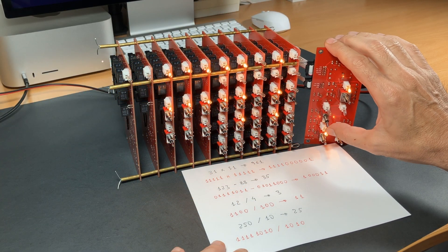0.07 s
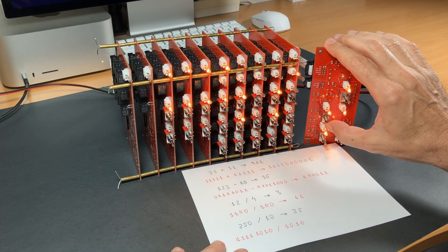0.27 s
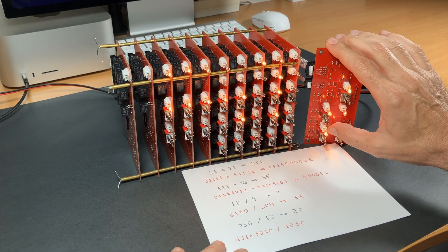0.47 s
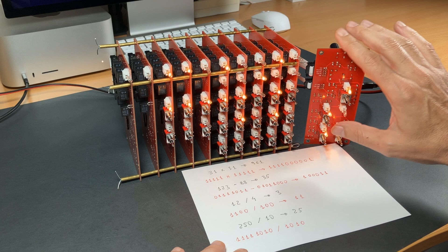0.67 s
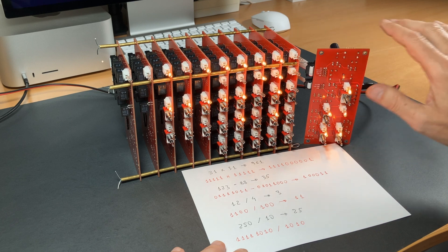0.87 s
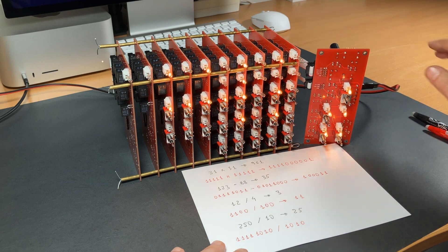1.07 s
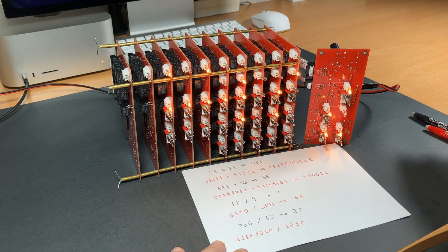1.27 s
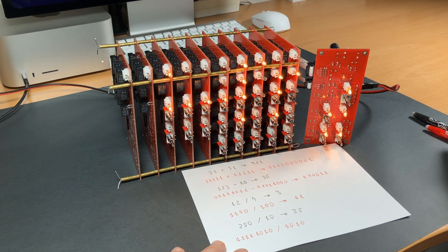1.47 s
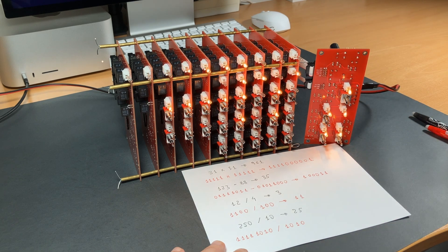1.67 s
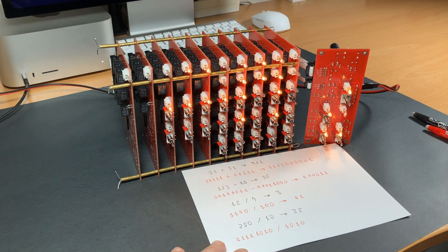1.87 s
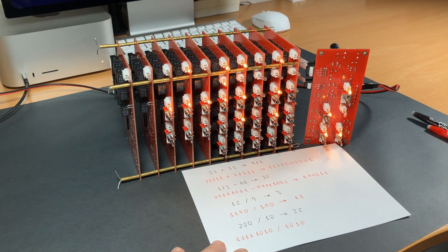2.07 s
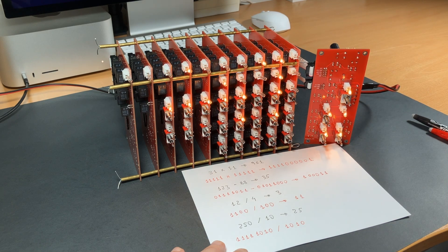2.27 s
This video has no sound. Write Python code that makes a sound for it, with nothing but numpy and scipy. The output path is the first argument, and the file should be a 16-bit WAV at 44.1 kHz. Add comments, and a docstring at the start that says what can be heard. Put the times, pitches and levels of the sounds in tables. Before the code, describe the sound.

Relays in a home-built calculator clatter in a fast, even rhythm, set off by one snap of a push button. The sharp metallic clicks ring slightly, heard close by in a small, quiet room.

```python
"""A relay calculator dividing

A push button starts a home-built calculator on a desk. Its clock pulls in a bank of relays (switches
worked by magnets) and lets them drop again, nearly nine times a second. Each stroke is a quick volley:
contacts snap, metal frames clink and the moving arms knock on the circuit boards.
The springs are left ringing in a small, quiet room."""
import sys
import numpy as np
from scipy import signal
from scipy.fft import rfft, irfft
from scipy.io import wavfile

SR = 44100
rng = np.random.default_rng(int(sys.argv[2]) if len(sys.argv) > 2 else 0)


def unload_wav(signal):
    """Save mono or channel-first audio to the path in sys.argv[1] as 16-bit WAV at rate SR, clipped to [-1, 1]."""
    wavfile.write(
        sys.argv[1],
        SR,
        np.round(np.clip(np.atleast_2d(signal).T, -1, 1) * 32767).astype(np.int16),
    )


N = 102797

# the clock's beats: (time [s], early snaps and clinks [dB], late ones [dB], board knocks [dB])
BEATS = [(0.2612, 0, 2.5, -1), (0.3779, 1.4, 0.5, 0), (0.4918, -0.7, 5.3, -3), (0.6088, -1, 1, 1.3),
         (0.7247, -0.3, 2.7, -0.8), (0.84, 2, 0, -0.5), (0.9558, 0.5, 3, -2.2), (1.071, 1.3, 1.5, -0.8),
         (1.1864, -1.0, 3, -2.5), (1.3018, 1.5, 2.5, 0), (1.4177, 1.6, 2.5, -2.5), (1.5331, -0.5, 2, 0.9),
         (1.6493, 1, 2, -1), (1.7637, 1.5, 0.5, -1), (1.8793, 1, 5, -2.7), (1.995, 3.7, 2, 1.5),
         (2.1105, 0.1, 0.5, -3.5), (2.227, 0.1, -1.1, 0)]


def amp(db):
    """Turns decibels into a gain."""
    return 10 ** (np.asarray(db) / 20)


def unit(x):
    """Scales a sound to an energy of one."""
    return x / np.sqrt(np.sum(x ** 2) + 1e-20)


def read(points, hz):
    """Reads between a table's rows on a logarithmic frequency scale."""
    freqs, values = np.transpose(points)
    return np.interp(np.log(hz + 1), np.log(freqs + 1), values)


def add(mix, start_s, sound):
    """Adds a sound to the mix at a given time."""
    part = mix[max(round(start_s * SR), 0):][:len(sound)]
    part += sound[:len(part)]


def fade(t, fade_s):
    """Dies away by 60 dB in the fade time."""
    return np.exp(-np.log(1000) * t / fade_s)


def colour(x, tone, size=4096):
    """Gives a sound a tone colour, using a filter that rings only after each hit."""
    log_gain = np.log(amp(read(tone, abs(np.fft.fftfreq(size, 1 / SR)))))
    taps = np.fft.ifft(np.exp(signal.hilbert(log_gain).conj())).real
    return signal.fftconvolve(x, unit(taps[:size // 2]))[:N]


def burst(fade_s, size=2048):
    """A small struck part rings at so many pitches that it sounds like a puff of noise."""
    envelope = fade(np.arange(size) / SR, fade_s)
    noise = rng.standard_normal(size) * envelope
    for _ in range(2):  # even out the frequencies
        spectrum = rfft(noise)
        noise = irfft(spectrum / (abs(spectrum) + 1e-12), size) * envelope ** (1 / 4)
    return unit(noise)


def ring(notes, detune=0.0028, spread_db=2.0, size=16000):
    """A struck part's notes swell over a few cycles and die away, a little differently each time."""
    t, out = np.arange(size) / SR, np.zeros(size)
    for hz, db, fade_s in notes:
        gain = amp(db + spread_db * rng.standard_normal()) * rng.choice([-1, 1])
        pitch_hz = hz * (1 + detune * rng.standard_normal())
        swell = 1 - np.exp(-hz * t / 2)
        out += gain * unit(np.sin(2 * np.pi * pitch_hz * t) * swell * fade(t, fade_s))
    return out


def background(noise_db=-63, hum_hz=199, hum_db=-71):
    """Low room rumble, faint hiss and a weak hum."""
    # tone of the rumble and hiss: (frequency [Hz], relative level [dB])
    noise_tone = [(20, -59), (35, -53), (55, -3), (80, -4), (100, -6.5), (128, -6), (165, -4.5),
                  (205, -5.5), (310, -16), (500, -20), (1500, -31), (2900, -24), (10000, -30),
                  (16000, -29.5)]
    gains = amp(read(noise_tone, np.fft.rfftfreq(N, 1 / SR)))
    noise = irfft(rfft(rng.standard_normal(N)) * gains, N)
    hum = np.sin(2 * np.pi * hum_hz * np.arange(N) / SR)
    return np.sqrt(N) * (amp(noise_db) * unit(noise) + amp(hum_db) * unit(hum))


def button(press_s=.2308, click_db=2.5, ring_delay_s=.0025):
    """The start button snaps; its board rings a moment later."""
    # tone of the snap: (frequency [Hz], relative level [dB])
    click_tone = [(100, -25), (380, -15.5), (500, -11), (800, 1), (1100, 4), (1400, 3.5), (1750, 2),
                  (1920, -2), (2250, 4), (2900, 0), (3600, -8), (4400, 0.5), (8000, -2.5), (12000, 1.5),
                  (15400, -1.5), (16500, -38)]
    # notes of the button's board: (pitch [Hz], level [dB], fade time [s])
    board_notes = [(497, -17.5, 0.057), (564, -12, 0.056), (690, -13, 0.021), (783, -6, .045),
                   (938, -9, 0.068)]
    click = np.zeros(N)
    add(click, press_s, amp(click_db) * burst(fade_s=.03))
    out = colour(click, click_tone)
    add(out, press_s + ring_delay_s, ring(board_notes, spread_db=0))
    return out


def desk():
    """Dull thuds pass through the desk: one under the button press, two faint ones later."""
    # the thuds: (time [s], level [dB])
    thuds = [(.243, -16.5), (2.029, -37), (2.12, -27)]
    # tone of the desk: (frequency [Hz], relative level [dB])
    desk_tone = [(25, -14), (65, -1.5), (125, -4.5), (200, -14.5), (320, -17), (700, -41.5)]
    out = np.zeros(N)
    for start_s, db in thuds:
        add(out, start_s, amp(db) * burst(fade_s=.18, size=8192))
    return colour(out, desk_tone)


def volley(bank, strokes, alike=0.46, spread_db=1.33, late_after_s=.008):
    """Each relay hits once per stroke with its own snap, clink and knock, slightly early or late."""
    tracks = np.zeros((3, N))
    fades_s = .012, .024, .03  # snap, clink, knock
    for delay, scatter, *levels in bank:
        voices = [burst(fade_s) for fade_s in fades_s]  # the share that is alike on every hit
        for start_s, early_db, late_db, knock_db in strokes:
            slip, force = rng.standard_normal(2)
            metal_db = late_db if delay > late_after_s else early_db
            accents = metal_db, metal_db, knock_db
            for track, voice, fade_s, db, accent_db in zip(tracks, voices, fades_s, levels, accents):
                click = np.sqrt(alike) * voice + np.sqrt(1 - alike) * burst(fade_s)
                gain = amp(db + accent_db + spread_db * force)
                add(track, start_s + delay + scatter * slip, gain * click)
    return tracks


def relays(drop_after_s=.0651):
    """The relays clatter as they pull in on each beat, and again as they drop out."""
    # relays pulling in: (delay [s], timing scatter [s], snap [dB], clink [dB], knock [dB])
    pull_in = [(-.0005, .0001, -21, -40, -40), (.0016, .00005, -7.5, -19, -34),
               (.0041, .0001, -13, -14.5, -30), (.0068, .0004, -23, -17, -22),
               (.0095, .0007, -20, -20, -19), (.0128, .0006, -18, -17.5, -16),
               (.0155, .0008, -22, -21, -17), (.0195, .001, -29, -25, -21)]
    # relays dropping out: (delay [s], timing scatter [s], snap [dB], clink [dB], knock [dB])
    drop_out = [(.0003, .0002, -21, -38, -38), (.0016, .00005, -14.5, -23, -36),
                (.0034, .0003, -17, -18.5, -27), (.0066, .0004, -21.5, -17.5, -23),
                (.0098, .0004, -26, -24, -23)]
    # tones of contact snap, frame clink and board knock: (frequency [Hz], relative level [dB])
    snap_tone = [(1000, -26.5), (4000, -28), (6500, -1), (8300, -4.5), (9700, 3.5), (10300, 2.5),
                 (11300, 4.5), (12200, 0.5), (13900, 2), (15300, 3), (15900, -8), (16600, -47.5)]
    clink_tone = [(700, -43.5), (2000, -12), (3000, -6), (3700, -16), (4150, -1.5), (4750, -1.5),
                  (5400, 1.5), (6300, 0), (7100, -2), (8200, -7), (14000, -83)]
    knock_tone = [(100, -24), (400, -24.5), (680, -25), (820, -11.5), (1020, -7.5), (1200, -3),
                  (1380, -0.5), (1650, 0.5), (2000, -4.5), (2400, -11), (3800, -7.5), (8000, -40)]
    drops = [(beat_s + drop_after_s, 0, 0, 0) for beat_s, *_ in BEATS]  # no accents
    snaps, clinks, knocks = volley(pull_in, BEATS) + volley(drop_out, drops)
    ringing = sum(springs(beat_s, 0) + springs(beat_s + drop_after_s, 1) for beat_s, *_ in BEATS)
    return colour(snaps, snap_tone) + colour(clinks, clink_tone) + colour(knocks, knock_tone) + ringing


def springs(start_s, stroke, board_below_hz=2500):
    """Springs, frames and boards ring on after a stroke (0 is pull-in, 1 is drop-out)."""
    # their notes: (pitch [Hz], pull-in level [dB], drop-out level [dB], fade time [s])
    notes = [(1250, -28, -22, .05), (1335, -26, -20, .06), (1394, -26, -20, .1), (1540, -26, -24, .22),
             (1976, -29, -27, .2), (2832, -29.5, -26, .2), (2945, -29.5, -25.5, .15),
             (3402, -28, -21.5, .14), (5370, -29, -17.5, .022), (5503, -28, -17.5, .04),
             (5803, -26, -27, .07), (7103, -29, -33, .15)]
    out = np.zeros(N)
    for hz, *levels, fade_s in notes:
        # the metal rings almost at once, the boards with the late knocks
        delay_s = .008 if hz < board_below_hz else .0025
        add(out, start_s + delay_s, ring([(hz, levels[stroke], fade_s)], size=11000))
    return out


def counter():
    """A step counter knocks on its board: one stage every second beat, the next every fourth."""
    # each stage's knock: (delay [s], level [dB])
    stages = [(.011, -6.5), (.015, -1.5)]
    # low notes of its board: (pitch [Hz], level [dB], fade time [s])
    board_notes = [(817, -35, 0.12), (858, -27.5, 0.032), (1092, -19.5, 0.043)]
    out = np.zeros(N)
    for stage, (delay, db) in enumerate(stages, 1):
        every = 2 ** stage
        for beat_s, *_ in BEATS[every - 1::every]:
            add(out, beat_s + delay, amp(db) * ring(board_notes, size=6000))
    return out


def room(sound, echoes=3, delay_s=0.00067, rise_s=0.0017, turn_s=.37):
    """Blurred room echoes take turns, as relays at different places fire."""
    # how long the room rings: (frequency [Hz], fade time [s])
    fade_times = [(250, 0.7), (700, 0.53), (1500, 1.02), (5000, 0.64), (10000, 0.37), (16000, 0.43)]
    out, turn = np.zeros(N), np.arange(N) / SR / turn_s
    for k in range(echoes):
        hz, t, bands = signal.stft(rng.standard_normal(26000), SR, nperseg=256)
        fading_bands = bands * fade(t, read(fade_times, hz)[:, None])
        echo = signal.istft(fading_bands, SR, nperseg=256)[1]
        echo *= np.clip((np.arange(len(echo)) / SR - delay_s) / rise_s, 0, 1)
        share = np.sqrt(2 / echoes) * np.cos(np.pi * (turn + k / echoes))
        out += signal.fftconvolve(sound * share, unit(echo))[:N]
    return out


def scene(room_db=-4.5):
    """The machine, its echo and the background, in one channel."""
    machine = button() + desk() + relays() + counter()
    return (machine + amp(room_db) * room(machine) + background())[None]


def record(dry):
    """Cuts off the very highest treble."""
    cutoff_hz = 16550
    low_pass = signal.firwin(255, cutoff_hz, window=("kaiser", 9), fs=SR)
    return signal.oaconvolve(dry, low_pass[None], "same")


dry = scene()
out = record(dry)
unload_wav(out)
```